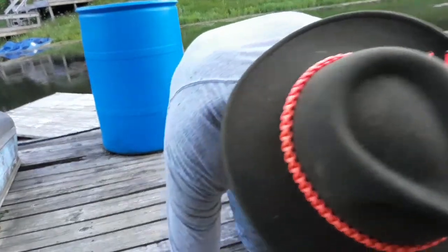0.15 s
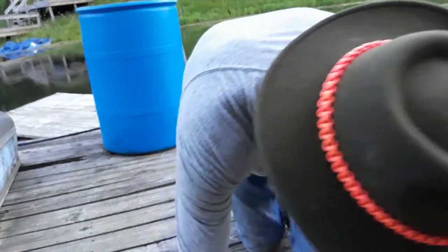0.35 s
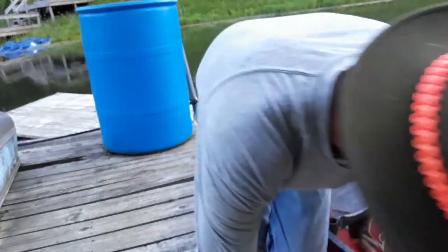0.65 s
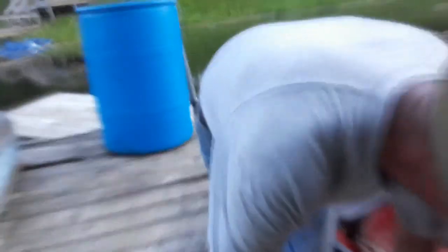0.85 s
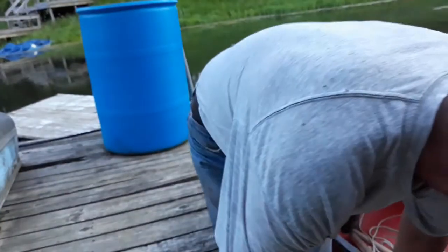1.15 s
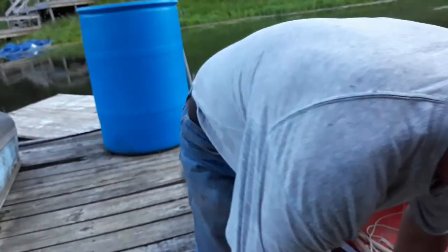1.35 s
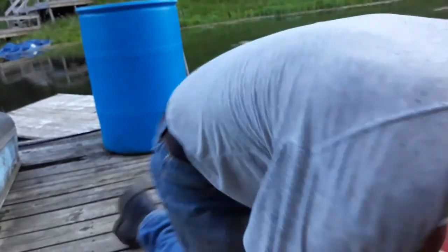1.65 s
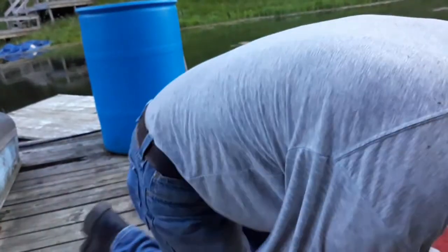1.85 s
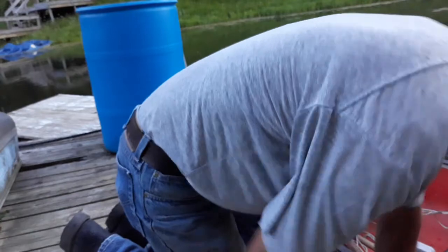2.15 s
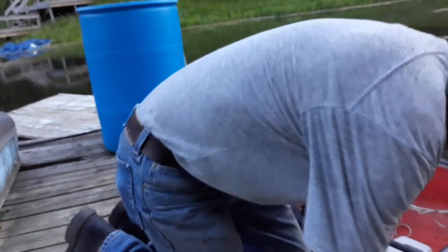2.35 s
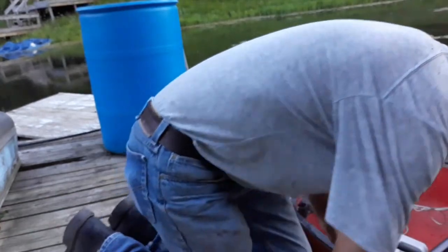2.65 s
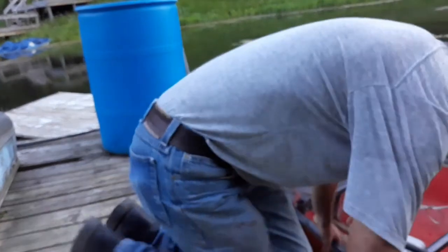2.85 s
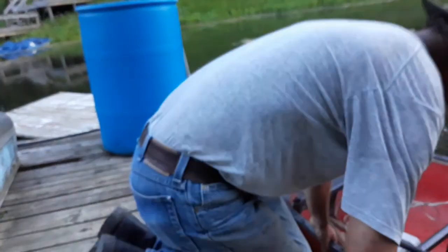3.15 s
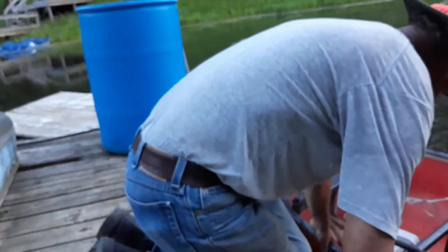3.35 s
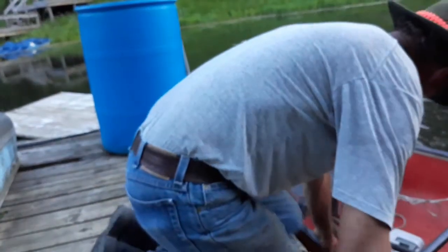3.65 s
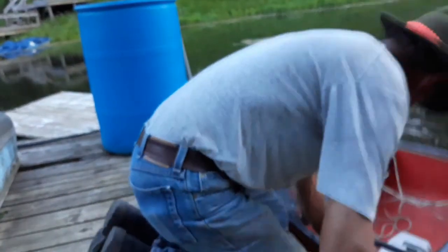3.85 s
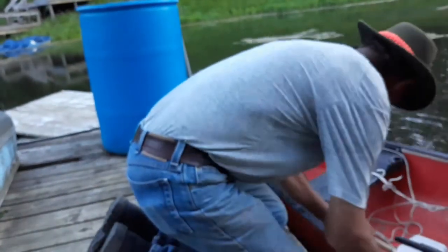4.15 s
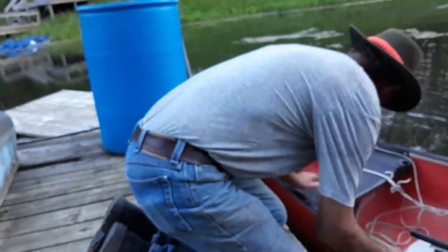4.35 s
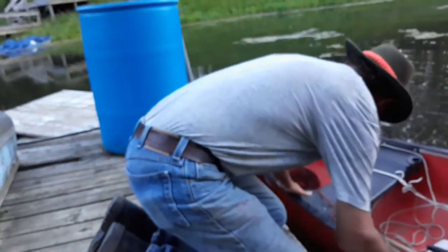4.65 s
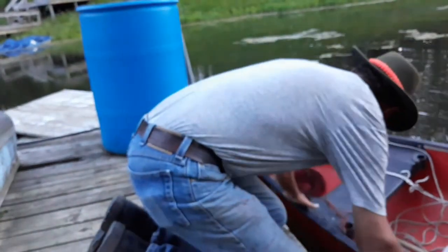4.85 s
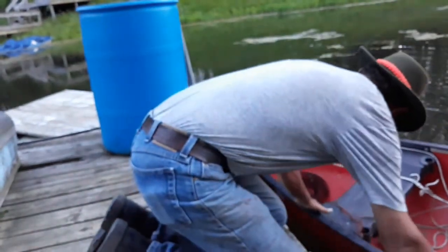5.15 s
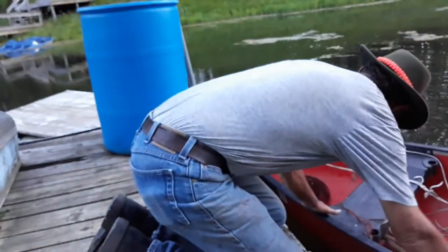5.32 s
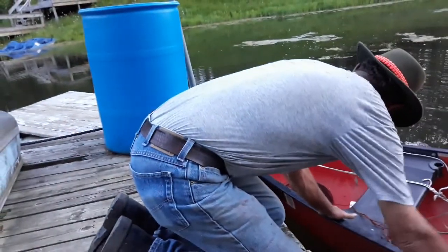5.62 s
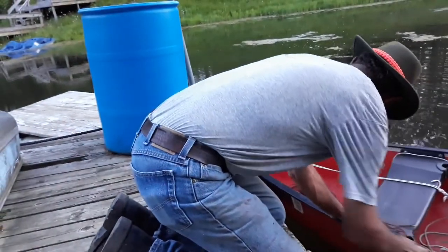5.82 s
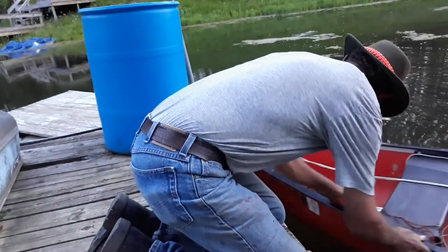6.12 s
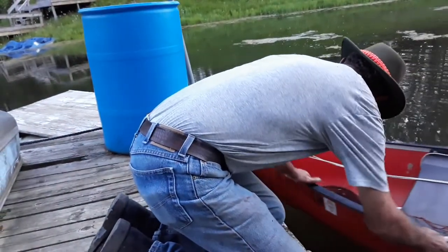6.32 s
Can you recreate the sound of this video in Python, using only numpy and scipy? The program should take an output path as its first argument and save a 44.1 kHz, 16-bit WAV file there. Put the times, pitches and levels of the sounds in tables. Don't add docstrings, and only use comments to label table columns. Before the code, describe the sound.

A constant high-pitched chorus of clicking frogs fills a lakeside, with a near caller rattling on the right and others answering from the reeds. A person shifting on a wooden dock beside a canoe makes muffled thuds, knocks and scrapes, strongest near one, two and three seconds, then only faint bumps. Soft fabric rubbing and tiny dry clicks sit close to the stereo microphone over quiet air and water noise.

```python
import sys
import numpy as np
from scipy import signal
from scipy.fft import rfft, irfft
from scipy.io import wavfile
from scipy.ndimage import uniform_filter1d

SR = 44100
rng = np.random.default_rng(int(sys.argv[2]) if len(sys.argv) > 2 else 0)


def transcribe(signal):
    frames = np.atleast_2d(signal).T
    limited = np.clip(frames, -1, 1)
    pcm = np.round(limited * 32767).astype(np.int16)
    wavfile.write(sys.argv[1], SR, pcm)


def invert_db(x):
    u = np.asarray(x, float) / 20
    return 10 ** u


N = 285768
PORT_LAG = 20

# f/Hz, t60/s, level/dB
DOCK_MODES = [(98, 0.098, -9), (140.4, 0.48, -12), (194.3, 0.11, 4.5), (230.8, 0.18, 3), (285.7, 0.058, 10),
              (382.6, 0.076, 8), (481, 0.048, 8), (627, 0.087, 0.5), (824, 0.0083, -35), (1112, 0.008, -22),
              (1750, 0.017, -19)]


def evened(x):
    return x / np.sqrt(np.mean(x ** 2) + 1e-20)


def band(x, lo_hz, hi_hz, order=2):
    sos = signal.butter(order, [lo_hz, min(hi_hz, .49 * SR)], "band", fs=SR, output="sos")
    return signal.sosfilt(sos, x)


def pair():
    return rng.standard_normal((2, N))


def patchy(x, patchy_db):
    z = signal.stft(x, nperseg=512)[2]
    field = rng.standard_normal(z.shape[1:])
    field = uniform_filter1d(uniform_filter1d(field, 6, 0), 8, 1)
    return signal.istft(z * invert_db(patchy_db * evened(field)), nperseg=512)[1][:, :N]


def shore(x, t60=1.0):
    t = np.arange(SR // 2) / SR
    sign = rng.choice([-1., 1.], (2, len(t)))
    present = rng.random((2, len(t))) < .05
    taps = sign * present * invert_db(-60 * t / t60) * (t > .006)
    return signal.fftconvolve(x, taps / np.linalg.norm(taps[0]), axes=1)[:, :N]


def pulses(s, db, hz, lag, left_db, bright_db=0):
    overtones = [(1.3, -25.5, 0.81), (1.52, -21, 0.4), (2.0, -28.5, 0.35), (2.9, -46, 0.18),
                 (3.35, -49, 0.51), (3.78, -44.5, .6), (.82, -21, 1), (.56, -39.5, 0.72)]
    rise_ms, snap_ms, ring_ms, ring = .9, .95, 3.2, .2
    shade_dull_db = -1.5
    t = np.arange(420) / SR * 1000
    swell = 1 - np.exp(-(t / rise_ms) ** 2)
    decay = (1 - ring) * np.exp(-t / snap_ms) + ring * np.exp(-t / ring_ms)
    shape = swell * decay * np.cos(np.pi / 2 * t / t[-1])
    stretch_ms = .035 * (1 - np.exp(-t / 1.3))
    phase = 2 * np.pi * hz[:, None] * (t + stretch_ms) / 1000
    wave = shape / shape.max() * np.sin(phase)
    shine = 0
    late = np.maximum(t - .3, 0)
    for k, over_db, ms in overtones:
        gain = invert_db(over_db + bright_db * (k < 2.5))
        shine = shine + gain * (late / ms) * np.exp(1 - late / ms) * np.sin(k * phase)
    shaded = wave + invert_db(shade_dull_db * lag[:, None] / PORT_LAG) * shine
    shaded = shaded * invert_db(db + left_db)[:, None]
    wave = (wave + shine) * invert_db(db)[:, None]

    margin, size = 1000, N + 4000
    start = np.round(s * SR).astype(int)[:, None] - shape.argmax() + np.arange(len(t)) + margin
    left = np.bincount((start + lag[:, None]).ravel(), shaded.ravel(), size)
    right = np.bincount(start.ravel(), wave.ravel(), size)
    return np.array([left, right])[:, margin:N + margin]


def trains(rows, tire_db):
    quicken_ms = .42
    s, db, count, gap_ms = np.repeat(rows, np.transpose(rows)[2].astype(int), axis=0).T
    k = np.concatenate([np.arange(row[2]) for row in rows])
    wobble_db = .6 * rng.standard_normal(len(k))
    at = s + (gap_ms * k - quicken_ms * k * (k - 1) / 2) / 1000
    return at, db - tire_db * k ** 2 + wobble_db, k


def near_frogs():
    # t/s of the first peak, peak level/dB, pulses, first spacing/ms
    closest = [(0.2107, -4, 4, 5.4), (0.4584, -3, 5, 5.3), (0.7095, -4, 4, 5.4), (0.9408, -3, 5, 5.1),
               (1.1601, -2.5, 5, 5.2), (1.4051, -4, 5, 5.4), (1.5516, -4, 4, 5.5), (1.6768, -4, 4, 5.6),
               (1.7994, -3.5, 3, 5.7), (1.9243, -4, 4, 5.7), (2.0524, -4, 4, 5.7), (2.1871, -4.5, 4, 6.1),
               (2.337, -3.5, 3, 6.1), (2.4997, -5, 4, 5.2), (2.6952, -5, 5, 5.8), (2.8749, -4, 5, 5.9),
               (3.0147, -6.5, 4, 5.8), (3.1439, -8, 4, 6.0), (3.3457, -6, 4, 6.5), (3.6434, -7, 4, 6.4),
               (3.9054, -7, 5, 5.9), (4.1347, -8.5, 5, 6.2), (4.2946, -10, 4, 6.0), (4.5207, -7, 4, 6.6),
               (5.058, -9, 4, 5.4), (5.6118, -8.5, 5, 5.8), (5.8315, -8.5, 4, 6.4), (6.1359, -8, 5, 5.2),
               (6.339, -9, 4, 6.3), (6.4485, -11, 3, 5.2)]
    # t/s, peak level/dB, pulses, first spacing/ms
    answers = [(0.0028, -9, 1, 0), (0.0586, -12, 2, 12.6), (0.0924, -9, 1, 0), (0.1025, -10, 3, 6.8),
               (0.2773, -12, 2, 28), (0.329, -11, 2, 10.3), (0.3598, -11, 4, 6.5), (0.5772, -13, 3, 11),
               (0.7995, -11.5, 4, 11), (1.0328, -12, 1, 0), (1.045, -11, 4, 6.3), (1.303, -11, 1, 0),
               (2.047, -13, 1, 0), (2.0759, -14, 1, 0), (2.3209, -11, 2, 7.6), (2.36, -13, 1, 0),
               (2.4681, -7, 1, 0), (2.593, -12.5, 4, 8.3), (2.6225, -10.5, 5, 5.6), (2.9004, -11.5, 3, 5.4),
               (3.2082, -12, 1, 0), (3.2892, -9.5, 2, 19.1), (3.561, -11, 1, 0), (3.5898, -8.5, 2, 11.9),
               (3.8728, -10, 1, 0), (4.4349, -12, 2, 6), (4.4498, -10, 3, 21.6)]
    # t/s, sac pitch f/Hz, left port shade level/dB, left port lag/samples
    handover = [(0, 3520, -6.5, 21), (2.0, 3520, -6.5, 21), (2.6, 3520, -5, 21), (3.3, 3600, -4, 21),
                (3.7, 3640, -4, 21), (4.4, 3530, -3.8, 21), (4.52, 3680, -4.5, 21), (5.0, 3780, -3.5, 19),
                (6.48, 3760, -3.5, 19)]
    s, db, place = np.hstack([trains(closest, tire_db=0.72), trains(answers, tire_db=0.27)])
    when, hz, shade_db, lag = np.transpose(handover)
    pitch = np.interp(s, when, hz) + 29 * place + 8 * db + 40 * rng.standard_normal(len(s))
    lag = np.round(np.interp(s, when, lag)).astype(int)
    bright_db = np.where(s > 5, 5, 0)[:, None]
    return pulses(s, db, pitch, lag, np.interp(s, when, shade_db), bright_db)


def lone_clicks():
    # t/s, peak level/dB, sac pitch f/Hz
    clicks = [(0.0027, -10, 3540), (0.0184, -17, 3570), (0.1093, -11, 3450), (0.2773, -13, 3390),
              (0.3915, -15, 3480), (0.5613, -15, 3320), (0.5865, -16, 3350), (0.5934, -15, 3440),
              (0.5995, -15, 3540), (0.6173, -16, 3510), (0.7739, -17, 3310), (0.7834, -16, 3300),
              (0.8109, -12, 3310), (0.8194, -12, 3340), (0.8259, -15, 3450), (0.8376, -16, 3510),
              (1.0068, -15, 3300), (1.0173, -13, 3360), (1.0571, -14, 3470), (1.0682, -15, 3510),
              (1.2919, -14, 3470), (1.2975, -17, 3480), (1.3138, -17, 3570), (1.5462, -15, 3560),
              (1.7652, -17, 3330), (1.7822, -16, 3300), (1.8229, -16, 3480), (2.029, -17, 3300),
              (2.0809, -17, 3470), (2.2884, -14, 3360), (2.3044, -16, 3300), (2.3284, -11, 3410),
              (2.36, -15, 3430), (2.3649, -17, 3460), (2.5669, -17, 3250), (2.6011, -14, 3290),
              (2.6475, -15, 3500), (2.9056, -11, 3430), (3.2017, -17, 3330), (3.4996, -17, 3400),
              (3.5151, -17, 3430), (3.6668, -16, 3610), (4.4927, -11, 3510), (4.8922, -16, 3310),
              (4.913, -14, 3520), (4.932, -17, 3480), (4.9751, -17, 3540), (5.0211, -16, 3580),
              (5.215, -17, 3580), (5.464, -17, 3540), (5.4857, -17, 3600), (5.5439, -16, 3470),
              (5.5907, -18, 3530), (5.9149, -17, 3590), (5.9248, -17, 3600), (5.9986, -17, 3470),
              (6.0393, -16, 3630), (6.0434, -16, 3400), (6.1616, -17, 3410), (6.1866, -17, 3490)]
    s, db, hz = np.transpose(clicks)
    return invert_db(1.5) * pulses(s, db, hz, np.full(len(s), PORT_LAG), np.full(len(s), -5.0))


def calls(s, db, count, gap_ms, hz, lag, left_db, climb_hz, sag_db):
    call = np.repeat(np.arange(len(s)), count)
    number = np.arange(len(call)) - np.repeat(np.cumsum(count) - count, count)
    k = number - (count[call] - 1) / 2
    at = s[call] + number * gap_ms[call] / 1000
    pitch = hz[call] + climb_hz * k + 40 * rng.standard_normal(len(call))
    return pulses(at, db[call] - sag_db * k, pitch, lag[call], left_db[call])


def reed_frogs():
    # t/s, peak level/dB, pulses, spacing/ms
    reeds = [(0.122, -15, 2, 6.3), (0.252, -18, 7, 3.7), (0.3847, -17, 3, 6.2), (0.605, -16, 5, 5.2),
             (0.7632, -18, 7, 4.9), (0.8375, -17, 3, 6.6), (1.068, -16, 3, 5.7), (1.2771, -15, 4, 6.8),
             (1.5265, -18, 3, 6.6), (1.8141, -18, 5, 6.6), (2.0809, -17, 6, 5.0), (2.2675, -18, 5, 6.5),
             (2.365, -17, 3, 6.5), (2.9159, -16, 5, 4.9), (3.1928, -15, 2, 9.0), (3.214, -17, 7, 5.0),
             (3.4854, -21, 7, 5.7), (3.6669, -20, 4, 6.6), (4.3838, -17, 8, 6.3), (4.72, -19, 8, 5.5),
             (4.92, -14, 4, 4.5), (4.962, -19, 4, 6.1), (5.2424, -19, 9, 6.4), (5.4576, -18, 9, 6.8),
             (5.585, -17, 5, 5.5), (5.6551, -15, 3, 4.5), (5.7641, -19, 8, 6.7), (6.0394, -15, 2, 9.2),
             (6.1617, -16, 3, 6.6), (6.3667, -17, 3, 6.3)]
    # t/s, peak level/dB, pulses, spacing/ms, sac pitch f/Hz
    deep = [(3.39, -27, 3, 4.5, 2760), (3.532, -26, 3, 4.5, 2660), (4.225, -28, 3, 4.5, 2660),
            (5.66, -23, 3, 4.5, 2750), (5.907, -19, 5, 5.8, 3620), (6.042, -18, 4, 4.6, 3650),
            (6.045, -23, 4, 5, 3050), (6.143, -24, 3, 5, 3000), (6.232, -20, 12, 6.1, 3620),
            (6.333, -19, 5, 6.2, 3150), (6.4087, -20, 6, 6.3, 3590), (6.447, -22, 4, 5, 2900)]
    pitch = 3540 + 60 * rng.standard_normal((len(reeds), 1))
    s, db, count, gap_ms, hz = np.vstack([np.hstack([reeds, pitch]), deep]).T
    side = rng.uniform(0.16, 1.1, len(s))
    lag = np.round(PORT_LAG * side).astype(int)
    direct = calls(s, db, count.astype(int), gap_ms, hz, lag, -3.5 * side, climb_hz=17, sag_db=1.0)
    return direct + invert_db(-9) * shore(direct, .06)


def planks(t, tilt_db, spot):
    ring = 0
    for (hz, t60, db), shift in zip(DOCK_MODES, spot):
        decay = invert_db(db + tilt_db * np.log2(hz / 250) - 60 * t / t60)
        ring = ring + decay * np.sin(2 * np.pi * hz * shift * t)
    return ring


def knocks():
    # t/s, peak level/dB, tilt/(dB per octave), rattle length/s, pitch factor of the struck spot
    blows = [(0.13, -24, -15.5, 0.056, 0.73), (0.63, -43, -41, 0.18, 1.17), (0.737, -39, -7.5, 0.05, 0.95),
             (0.836, -22.5, -19, 0.088, 0.77), (0.944, -22.5, -19, 0.018, 0.94),
             (1.676, -25.5, -8.5, 0.077, 0.97), (1.739, -28.5, -2, 0.076, 1.22),
             (1.796, -21.5, 0, 0.087, 1.1), (2.02, -26.5, -14, 0.023, 0.7), (2.104, -20, 0, 0.051, 0.97),
             (2.46, -40.5, -14, 0.26, 0.7), (2.79, -39.5, 18, 0.11, 1.04), (2.859, -36, -6, 0.013, .98),
             (2.911, -24, -7.5, 0.033, 1.1), (3.432, -37.5, -9, 0.17, 1.15), (3.63, -43.5, 4.5, 0.2, 0.87),
             (3.779, -43, 18, 0.034, 1.7), (3.803, -33.5, -0.5, 0.015, 1.1), (3.986, -44.5, 6, 0.15, 1.14),
             (4.447, -36.5, 3, 0.054, 1.35)]
    blow_rise_s, spot_scatter = 0.0039, 0.048
    t, push = np.arange(SR // 2) / SR, np.zeros(N + SR)
    for s, db, tilt_db, rattle, spot in blows:
        force = (1 - np.exp(-(t / blow_rise_s) ** 2)) * invert_db(-30 * t / max(rattle, .005))
        bumps = rng.standard_normal(len(t)) * (rng.random(len(t)) < .05) * force
        shifts = spot * (1 + spot_scatter * rng.standard_normal(len(DOCK_MODES)))
        blow = signal.fftconvolve(bumps, planks(t, tilt_db, shifts))[:len(t)]
        push[round(s * SR):][:len(t)] += invert_db(db) * blow / abs(blow).max()
    return push[:N]


def thumps():
    # t/s, peak level/dB, plank pitch f/Hz, swell/ms
    impacts = [(.136, -31.5, 229, 4.5), (.185, -37.5, 175, 9.2), (.843, -26, 233, 4.5),
               (0.89, -26.5, 160, 5.3), (.904, -28, 130, 8), (0.927, -33.5, 150, 9.3),
               (.946, -20.5, 168, 2.4), (1.678, -32.5, 180, 4), (1.799, -22, 226, 3.5),
               (1.872, -29, 185, 4), (2.108, -18.5, 188, 2.9), (2.118, -23.5, 334, 4.2),
               (2.124, -23.5, 204, 5.6), (2.861, -26.5, 209, 4), (2.913, -22.5, 205, 3.4),
               (3.821, -38, 223, 3.9), (4.463, -35, 309, 3.8), (4.481, -42, 232, 6),
               (4.51, -48.5, 210, 8.6), (4.549, -55, 173, 16), (4.615, -53, 159, 8.1)]
    t, out = np.arange(SR // 5) / SR, np.zeros(N + SR)
    for s, db, hz, ms in impacts:
        u = 1000 * t / ms
        lower = u * np.exp(1 - u) * np.sin(2 * np.pi * hz * t)
        upper = 2 * u * np.exp(1 - 2 * u) * np.sin(2 * np.pi * 1.94 * hz * t)
        out[round(s * SR):][:len(t)] += invert_db(db) * (lower + invert_db(-4.0) * upper)
    return out[:N]


def landings(column, share):
    # t/s, thud level/dB, scrape level/dB, time to die away/s
    shuffle = [(0.148, -33.5, -57, 0.4), (0.641, -54.5, -58, 0.41), (0.759, -43.5, -59, .9),
               (0.849, -21.5, -28, 0.23), (0.953, -29.5, -58.5, 0.83), (1.679, -37.5, -45, 0.93),
               (1.805, -26.5, -47.5, 0.63), (2.029, -45, -57, 0.93), (2.117, -26, -65, 0.68),
               (2.398, -48, -64.5, 1), (2.861, -27.5, -52.5, 0.42), (2.918, -36, -52, 0.76),
               (3.061, -52, -45.5, 0.57), (3.129, -42, -47, 0.27), (3.457, -41, -44.5, 0.46),
               (3.64, -54, -73, 0.77), (3.826, -44.5, -55.5, 0.89), (4.05, -63, -58.5, 0.85),
               (4.5, -49.5, -56.5, 1)]
    rows, rise_s = np.array(shuffle), 0.024
    grid = np.arange(0, N + 64, 64)
    t = grid / SR - rows[:, :1]
    fall = np.where(t > 0, t / (share * rows[:, 3:]), -t / (2 * rise_s))
    gain = invert_db(rows[:, column, None] - 60 * fall)
    return np.interp(np.arange(N), grid, np.sqrt((gain ** 2).sum(0)))


def shuffling():
    grit = pair() * invert_db(1.9 * np.minimum(rng.exponential(1, (2, N)), 5)) * (rng.random((2, N)) < .03)
    t = np.arange(SR // 2) / SR
    thud = signal.fftconvolve(grit[0], planks(t, -12.5, np.ones(len(DOCK_MODES))))[:N]
    thud = evened(thud) * landings(column=1, share=0.96) * invert_db(-4.5)
    scrape = evened(band(grit[1], 93, 1000)) * landings(column=2, share=0.65) * invert_db(-1.0)
    return thud + scrape


def dock():
    wood = band(knocks() + thumps() + shuffling(), 92, 3500, order=3) * np.ones((2, 1))
    direct = np.array([wood[0], np.roll(wood[1], 8)]) * invert_db([[.8], [0]])
    return direct + invert_db(-7.5) * band(shore(wood, 0.081), 200, 3700, order=1)


def strokes():
    rubs = [(0.102, -65, 0.35), (0.611, -67, 0.041), (0.859, -58, 0.064), (1.053, -66, 0.24),
            (1.8, -64, 0.32), (2.364, -67, 0.036), (2.935, -63, 0.26), (3.498, -64.5, 0.15),
            (3.822, -64.5, 0.15), (4.476, -65.5, .35), (5.672, -78, 0.065), (6.104, -64.5, 0.45)]
    s, db, half = np.transpose(rubs)[:, :, None]
    power = invert_db(2 * db) * np.exp(-2 * ((np.arange(N) / SR - s) / half) ** 2)
    return np.sqrt(power.sum(0) + invert_db(2 * -82))


def cloth():
    grains = rng.standard_normal(N) * invert_db(3.6 * np.minimum(rng.exponential(1, N), 5)) * (rng.random(N) < .1)
    rub = np.array([np.roll(grains, 9), grains]) / grains.std() + 0.49 * pair()
    rub = evened(patchy(band(rub, 8500, 16500), patchy_db=3.5))
    return rub * strokes() * invert_db([[-4.5], [-.6]])


def clink():
    # f/Hz, level/dB
    metal = [(4930, -4), (6050, 0), (7450, -3), (9000, -8), (11100, -6), (12200, -9), (13800, -7)]
    at_s, db, length_ms = 3.7805, -43, 6
    t, out = np.arange(3000) / SR, np.zeros(N)
    u = 1000 * t / length_ms
    ring = sum(invert_db(mode_db) * np.sin(2 * np.pi * hz * t) for hz, mode_db in metal)
    out[round(at_s * SR):][:len(t)] += invert_db(db) * np.sqrt(u) * np.exp(-u ** 1.5) * ring
    return out


def ticks():
    # t/s, peak level/dB, length/ms
    snaps = [(.142, -45, 1.5), (.78, -46, 2.5), (.846, -44, 7), (.865, -33, 1.2), (.871, -39, .9),
             (.8765, -32, 1.2), (.8815, -35, .9), (.887, -37, 1.2), (.9035, -34, 1.1), (.911, -39, 1),
             (1.719, -43, 2.5), (2.858, -45, 1.5), (3.781, -37, 3), (3.785, -35, 5), (3.806, -46, 2)]
    t, out = np.arange(2000) / SR * 1000, np.zeros(N + SR)
    for s, db, ms in snaps:
        out[round(s * SR):][:len(t)] += invert_db(db) * rng.standard_normal(len(t)) * np.exp(-t / max(ms, .2))
    out = band(out[:N], 2500, 16000, order=1) + clink()
    return np.array([invert_db(-2.5) * np.roll(out, 14), out])


def crowd():
    # t/s, level/dB
    swell = [(0.0, -32), (0.68, -33), (0.94, -31.5), (1.32, -31), (2.54, -33), (2.63, -32.5), (2.92, -35),
             (3.08, -35.5), (3.28, -35), (4.75, -32), (4.93, -31.5), (5.09, -30.5), (5.4, -33.5),
             (6.48, -31.5)]
    u = rng.random((900, 6)).T
    side = np.clip(2.6 * u[0] - 1.1, -1, 1)
    hz = 3610 + 230 * (u[1] + u[2] - 1) - 850 * u[1] ** 5
    s, db = u[3] * N / SR - .01, -7 * u[4] - 10 * u[1] ** 5
    count, gap_ms = (3 + 7 * u[5]).astype(int), 4.8 + 3.0 * u[2]
    lag = np.round(PORT_LAG * side).astype(int)
    direct = calls(s, db, count, gap_ms, hz, lag, -1.5 - 2.5 * side, climb_hz=12, sag_db=1.5)
    mix = band(direct + invert_db(-3) * shore(direct), 900, 10000)
    power = uniform_filter1d((mix ** 2).mean(0), SR // 12)
    when, level_db = np.transpose(swell)
    gain = invert_db(np.interp(np.arange(N) / SR, when, level_db))
    return invert_db(3.0) * gain * mix / np.sqrt(power + 1e-9)


def air():
    # f/Hz, spectral level/dB
    spectrum = [(25, -56), (110, -35.5), (240, -48), (370, -46.5), (800, -49), (1100, -54.5), (1600, -41),
                (2600, -35.5), (5000, -46), (7200, -46.5), (9000, -56), (13800, -65.5), (16000, -84.5)]
    hz = np.fft.rfftfreq(N, 1 / SR)
    f, db = np.transpose(spectrum)
    a, b = rfft(pair())
    same = .93 / (1 + (hz / 500) ** 2)
    z = np.array([a, same * a + np.sqrt(1 - same ** 2) * b])
    z = z * invert_db(np.interp(np.log(hz + 1), np.log(f), db))
    return invert_db(-53.5) * evened(patchy(irfft(z, N), patchy_db=1.5))


def scene():
    near = invert_db(-.3) * near_frogs() + invert_db(-3.5) * reed_frogs() + lone_clicks()
    near = near + invert_db(-16) * shore(near, .06)
    return near + dock() + cloth() + ticks() + crowd() + air()


def thin_faint_bands(x):
    z = signal.stft(x, nperseg=1024, noverlap=768)[2]
    power = uniform_filter1d(uniform_filter1d((abs(z) ** 2).mean(0), 6, 0), 4, 1)
    usual = np.median(power, axis=1, keepdims=True)
    faint = usual < usual.max() * invert_db(-2 * 40)
    dips = power < np.percentile(power, 18, axis=1, keepdims=True)
    gain = np.where(faint & dips, invert_db(-16), 1)
    return signal.istft(z * gain, nperseg=1024, noverlap=768)[1][:, :N]


def low_pass(x):
    return signal.sosfilt(signal.butter(12, 15890, fs=SR, output="sos"), x)


def record(dry):
    edge = signal.firwin(255, 15900, window=("kaiser", 8), fs=SR)
    mix = signal.oaconvolve(thin_faint_bands(dry), edge[None], "same")
    return low_pass(mix)


dry = scene()
out = record(dry)
transcribe(out)
```